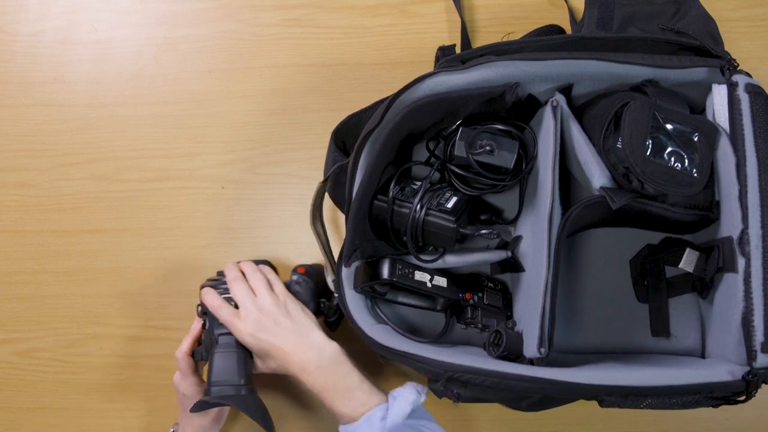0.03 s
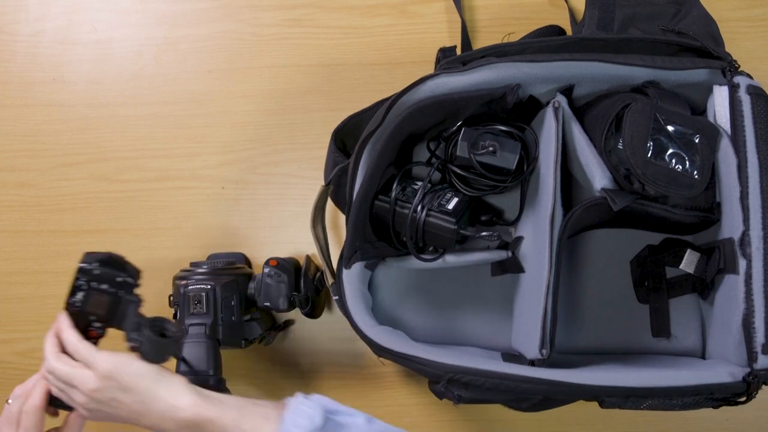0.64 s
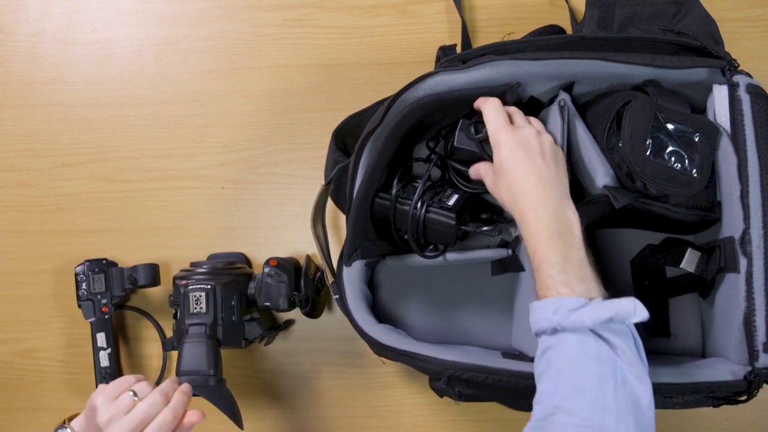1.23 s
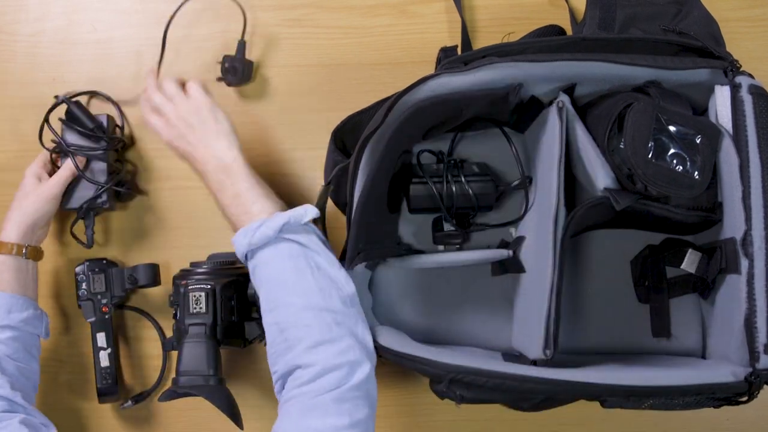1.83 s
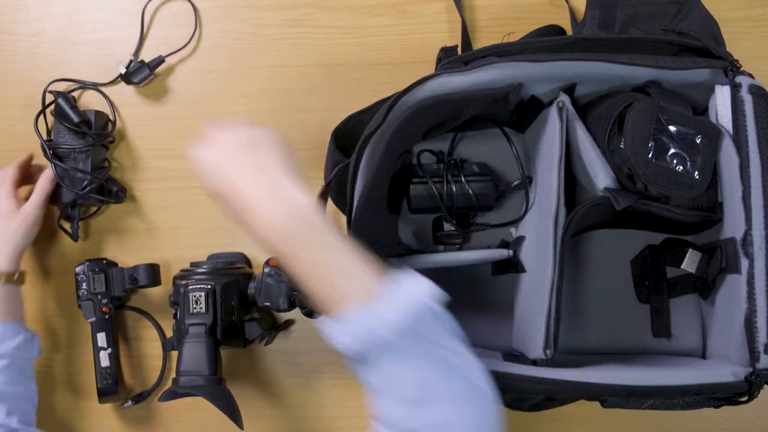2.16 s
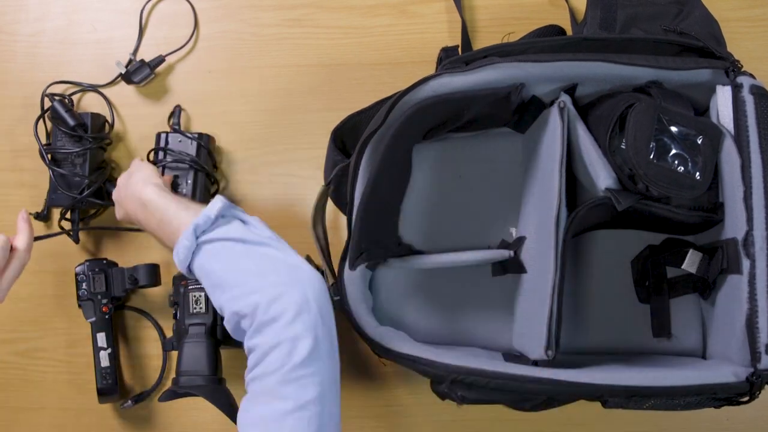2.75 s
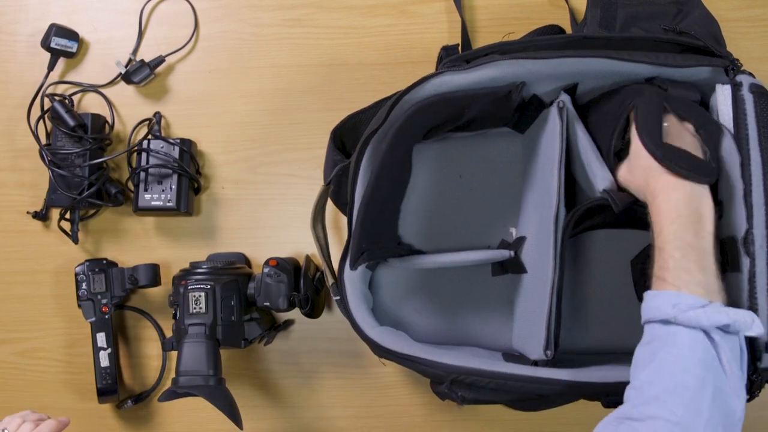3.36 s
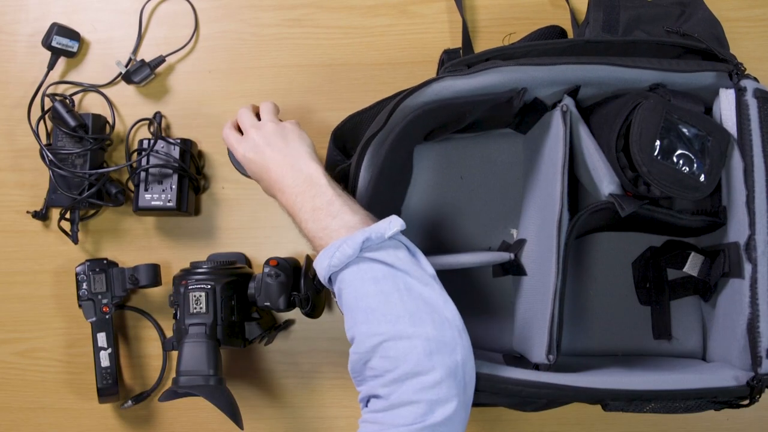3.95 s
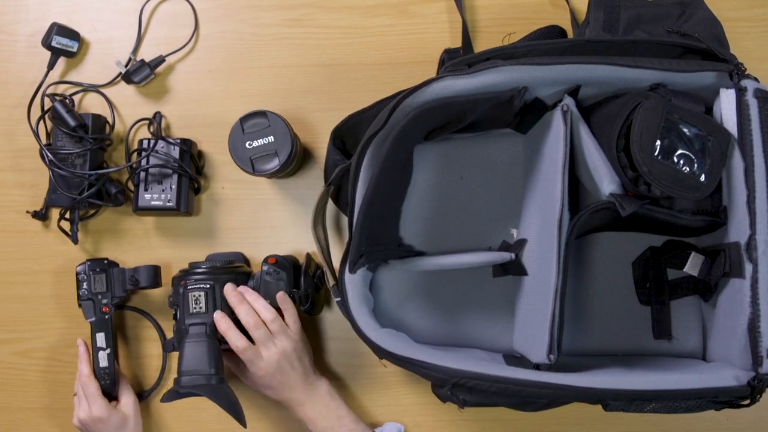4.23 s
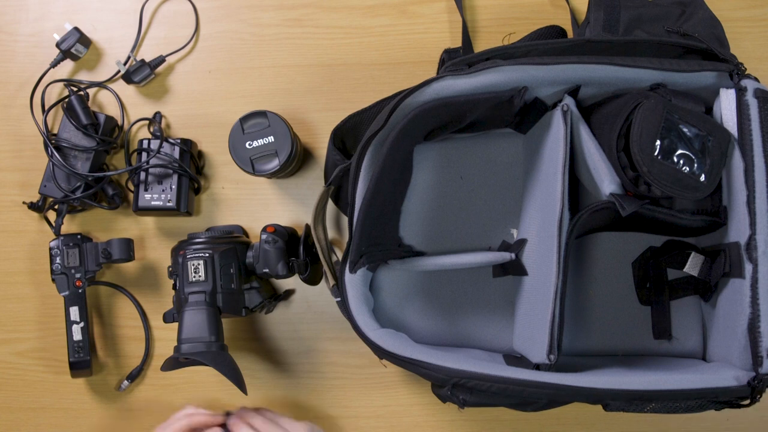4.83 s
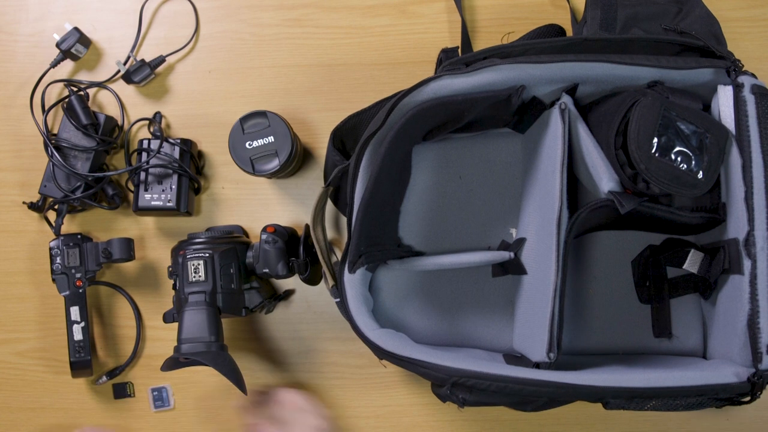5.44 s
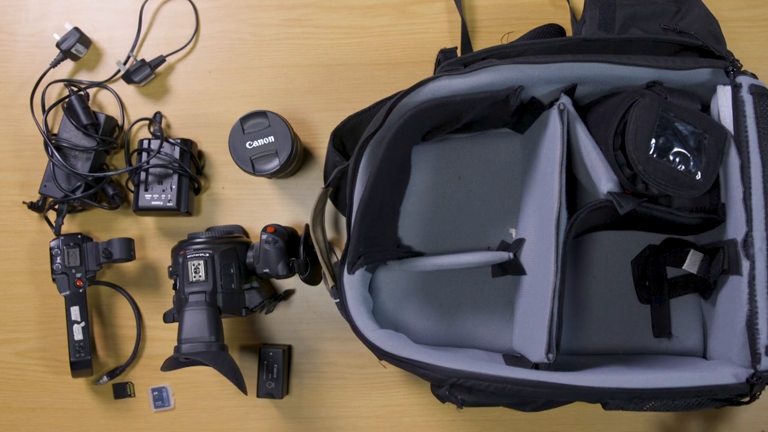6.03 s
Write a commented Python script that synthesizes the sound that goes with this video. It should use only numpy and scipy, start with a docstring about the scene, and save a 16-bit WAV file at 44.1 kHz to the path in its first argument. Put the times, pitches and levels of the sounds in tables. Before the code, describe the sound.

Camera equipment is unpacked onto a wooden desk, close to one microphone in a quiet, dry room. A soft nudge comes first, then a handle knocks down and slides, a power supply clatters, a charger lands hardest, and a lens gives a firm knock. Small plastic ticks follow, and a battery clacks down last. Between landings, sleeves brush a padded bag and cables creak faintly over low ventilation.

```python
"""Camera gear knocks down on a wooden desk, close to one microphone in a quiet, dry room.
A camera is nudged; a handle, a power supply, a charger, a lens, memory cards and a battery land edge by
edge, ring briefly under the hand and stick and slip into place. Leads creak and a plug clinks. Between
landings, sleeves brush a padded bag and handled gear bumps dully. Faint ventilation lies behind it all."""
import sys
import numpy as np
from scipy import signal
from scipy.fft import rfft, irfft, next_fast_len
from scipy.io import wavfile
from scipy.ndimage import uniform_filter1d, minimum_filter1d

SR = 44100
rng = np.random.default_rng(int(sys.argv[2]) if len(sys.argv) > 2 else 0)


def pcm_store(signal):
    """Save signal as 16-bit PCM."""
    levels = np.round(np.clip(np.atleast_2d(signal), -1, 1) * 32767)
    wavfile.write(sys.argv[1], SR, levels.astype(np.int16).T)


N = 272877
TIME = np.arange(N) / SR
BLOW_SPAN_S, TOP_HZ = .01, 16100


# Gear landing close to the microphone. In all knocks and strokes, level is that of 700-3500 Hz;
# body (below) and click or hiss (above) are relative to it.
# Blows (time [s], level [dB], body [dB], click [dB]); modes on the desk (pitch [Hz], level [dB], t60 [s])
CHARGER_KNOCKS = [(2.8037, -37, 5, -8.5), (2.8195, -34, -2.5, -12), (2.8539, -53, 0.5, -3.5),
                  (3.0935, -40, -8, 3), (3.1359, -18, -17.5, -10.5), (3.1645, -24.5, -13, -12),
                  (3.1844, -35, -23, -17)]
CHARGER_MODES = [(740, -4, 0.12), (994, -2, 0.11), (1130, -2.5, 0.079), (1293, 12.5, 0.025),
                 (2044, 2, 0.031), (2396, 5.5, 0.024), (2700, -4.5, 0.03), (3190, -1, 0.015),
                 (3960, -16.5, 0.031), (6100, -22, 0.023)]
# Colour of the dense, quickly damped modes (frequency [Hz], gain [dB])
CHARGER_COLOUR = [(88, -46), (150, -23), (226, -27), (383, -14.5), (578, -10.5), (730, -7), (888, -4),
                  (1100, 1.5), (1290, -9.5), (1390, 0.5), (3350, -10.5), (4410, -28.5), (5150, -23),
                  (10800, -36.5), (16000, -45)]
def charger():
    """The charger touches down, then lands with the hardest knock of all."""
    return knocks(CHARGER_KNOCKS, CHARGER_MODES, CHARGER_COLOUR, mode_db=-2.5, contact_db=-2.5,
                  ring_t60=0.043, grip_t60=0.26, treble_life=0.69, thump_db=-13.5)


# The handle on the desk; columns as for the charger
HANDLE_KNOCKS = [(0.8312, -34.5, -18.5, 3.5), (0.9078, -27.5, -7, -13), (0.913, -25, -3.5, -8),
                 (0.9166, -29.5, 3, -18), (0.933, -32, -0.5, -11), (1.0041, -48.5, -27, -14),
                 (1.0711, -49.5, 0, -19.5)]
HANDLE_MODES = [(422, 0, 0.06), (464, -8.5, .11), (491, -1, .09), (723, -1, 0.088), (736, 0, 0.068),
                (824, -12, 0.072), (1140, -5.5, 0.058), (1310, -14.5, 0.05), (1740, -6, 0.066),
                (2660, -10, 0.027), (8200, -11.5, 0.024)]
HANDLE_COLOUR = [(120, -23.5), (250, -22), (370, -19.5), (460, -0.5), (600, -6), (760, 1), (1000, -5.5),
                 (1500, -11.5), (2400, -13), (3600, -22.5), (6500, -21), (9000, -22.5), (16000, -35)]
def handle():
    """The handle's edges strike the wood in a quick cluster."""
    return knocks(HANDLE_KNOCKS, HANDLE_MODES, HANDLE_COLOUR, mode_db=-4, contact_db=-4,
                  ring_t60=0.036, grip_t60=0.12, treble_life=0.67, thump_db=-18)


# Strokes on the wood (peak [s], rise [s], fall [s], level [dB], body [dB], hiss [dB])
HANDLE_SLIDES = [(0.952, 0.016, 0.033, -38.5, -8.5, -6), (0.99, 0.03, 0.049, -41.5, -13, -18.5)]
def handle_slide():
    """The handle judders into place; friction rings its modes."""
    return rubbing(HANDLE_SLIDES, HANDLE_MODES, HANDLE_COLOUR, mode_db=4,
                   slips_per_s=2400, spread_db=4, edge_db=-13.5, judder_db=5.5)


# The power supply on the desk; columns as for the charger
SUPPLY_KNOCKS = [(1.7894, -26.5, -8, -14), (1.806, -25.5, -10.5, -10), (1.8521, -51.5, 4, -3),
                 (1.8745, -45.5, -15, -15), (1.898, -45.5, -18, -3.5), (1.9136, -40.5, -9, -9),
                 (1.9293, -33.5, -13, -15), (1.9358, -45, -17, 6.5), (1.9425, -28, -19, -10),
                 (1.9575, -32.5, -14, -13.5), (1.9782, -37.5, -6.5, -17), (1.9987, -46, -15, -18),
                 (2.0603, -52.5, -2, -5), (2.0821, -44.5, -22, -1), (2.2314, -43.5, -5, -2)]
SUPPLY_MODES = [(401, -3.5, 0.066), (685, -6.5, 0.094), (804, -14, 0.11), (1048, -6, 0.27),
                (1283, -3.5, 0.048), (1480, -6, 0.017), (1710, -0.5, 0.045), (2520, -6, 0.024),
                (3330, -19, 0.051), (4323, -23, 0.011)]
SUPPLY_COLOUR = [(88, -59), (150, -16.5), (270, -25), (398, -6.5), (578, -3), (662, 4), (821, -9),
                 (1190, -2), (1360, -11.5), (1600, 1.5), (2180, -11.5), (2500, -4), (4670, -27),
                 (5570, -28.5), (16000, -47)]
def power_supply():
    """The power supply lands on two edges and clatters as it settles."""
    return knocks(SUPPLY_KNOCKS, SUPPLY_MODES, SUPPLY_COLOUR, mode_db=-6.5, contact_db=-8,
                  ring_t60=0.032, grip_t60=0.18, treble_life=0.68, thump_db=-15)


# The lens on the desk; columns as for the charger
LENS_KNOCKS = [(3.8339, -25, -6, -14.5), (3.8785, -39.5, -1.5, -10)]
LENS_MODES = [(386, -12, 0.1), (440, -28, 0.015), (622, -11, .06), (797, -11, 0.063), (1060, -4, 0.12),
              (1120, 2, 0.03), (1315, -13, 0.017), (1770, 4, 0.01), (2470, -17, 0.0355), (5030, -19, 0.035)]
LENS_COLOUR = [(150, -13), (280, -9), (376, 4.5), (550, -2), (850, 2), (1100, 1.5), (1400, 1), (1750, -2),
               (2400, -9), (3200, -9), (4200, -26), (5000, -23), (7000, -23.5), (16000, -61)]
def lens():
    """The lens meets the wood with one firm knock and a lighter one."""
    return knocks(LENS_KNOCKS, LENS_MODES, LENS_COLOUR, mode_db=-3.5, contact_db=-6,
                  ring_t60=0.036, grip_t60=0.33, treble_life=0.8, thump_db=-6)


# The battery on the desk; columns as for the charger
BATTERY_KNOCKS = [(5.7772, -29, -6.5, -16), (5.7832, -39.5, -6, -5.5), (5.8009, -25, -11, -10),
                  (5.8779, -49, -22, -14), (5.9302, -65.5, -11, 6)]
BATTERY_MODES = [(460, -6, 0.16), (625, -8, 0.27), (1051, 0.5, 0.14), (1704, -5.5, 0.049),
                 (2130, -12.5, 0.033), (2260, 1, 0.062), (3240, -10, 0.04), (3160, -16, 0.031),
                 (4670, 0, 0.026), (5420, -11, 0.041)]
BATTERY_COLOUR = [(88, -45), (150, -13), (291, -15), (484, 2), (601, -6.5), (805, 1.5), (905, -8),
                  (1170, -5), (1360, -4), (1870, -2.5), (2100, -12), (2360, -5), (3420, -16.5),
                  (6640, -15.5), (16000, -36)]
def battery():
    """The battery clacks down edge by edge."""
    return knocks(BATTERY_KNOCKS, BATTERY_MODES, BATTERY_COLOUR, mode_db=-9.5, contact_db=2,
                  ring_t60=0.036, grip_t60=0.27, treble_life=0.84, thump_db=-12)


# The camera on the desk; columns as for the charger
CAMERA_KNOCKS = [(0.0009, -42.5, -7.5, -26), (0.1291, -38.5, -10.5, -11), (0.1459, -54, 9.5, -11),
                 (0.1994, -58.5, 3.5, -25)]
CAMERA_MODES = [(291, -22, .09), (510, -5, 0.029), (690, 0.5, 0.043), (1062, -1.5, 0.15), (1530, -9, 0.041)]
CAMERA_COLOUR = [(88, -33), (150, -11), (391, 6), (566, -2.5), (905, -9), (1190, -19), (1290, -13),
                 (1420, -18.5), (7770, -26), (16000, -51)]
def camera():
    """Nudged, the camera knocks softly on the wood."""
    return knocks(CAMERA_KNOCKS, CAMERA_MODES, CAMERA_COLOUR, mode_db=-8.5, contact_db=4.5,
                  ring_t60=0.039, grip_t60=0.18, treble_life=0.62, thump_db=-14)


# Handling strokes (peak [s], rise [s], fall [s], level [dB], body [dB], hiss [dB])
HANDLING_RUBS = [(0.045, 0.027, 0.069, -53.5, -34, -3.5), (0.165, 0.041, 0.085, -67, 8.5, 0),
                 (0.855, 0.016, 0.02, -51, -34, 14), (0.88, 0.037, 0.047, -51.5, -28, 0),
                 (1.357, 0.027, 0.0088, -58.5, -20, -2), (1.885, 0.023, 0.074, -51, 0.5, -11.5),
                 (1.95, 0.016, 0.026, -34.5, -8.5, -18), (2.0, 0.028, 0.24, -56.5, 3.5, -33),
                 (2.13, 0.049, 0.082, -43.5, -12.5, -11.5), (2.95, 0.051, 0.065, -55.5, -6.5, -34),
                 (3.187, 0.017, 0.025, -41, -13, -27), (3.44, 0.18, 0.25, -67, -17, -4.5),
                 (3.945, 0.024, 0.077, -57.5, -17, -11.5), (4.245, 0.03, 0.029, -78, 20, -22),
                 (4.4, 0.081, 0.087, -58, -5, -2.5), (4.44, 0.03, 0.032, -45.5, -1.5, -6),
                 (5.085, 0.055, 0.12, -58.5, -19, -2), (5.222, 0.022, 0.016, -50.5, -33.5, 3),
                 (5.89, 0.02, 0.13, -54.5, -15.5, -15)]
# Desk modes (pitch [Hz], level [dB], t60 [s]); friction colour (frequency [Hz], gain [dB])
DESK_MODES = [(480, -2.5, .06), (526, -6.5, .05), (784, -6, 0.096), (1105, -0.5, 0.04), (1309, 1, 0.028),
              (1650, 0, 0.043), (1820, -3.5, 0.038), (2360, -5, 0.011)]
RUB_COLOUR = [(88, -44), (150, -14.5), (566, 6.5), (888, -3), (1190, -3), (1760, -9), (4240, -6.5),
              (5150, -6.5), (6510, -6.5), (8900, -5.5), (10000, -15), (14500, -18.5), (16000, -21)]
def handling_rubs():
    """Short rubs, scuffs and soft swells of handled gear."""
    return rubbing(HANDLING_RUBS, DESK_MODES, RUB_COLOUR, mode_db=-9,
                   slips_per_s=3500, spread_db=2.5, edge_db=-14, judder_db=3.5)


# Light touches, heard close (time [s], level [dB], click [dB]); modes and colour as for the charger
PLASTIC_TICKS = [(0.057, -60.5, 7), (0.2143, -69.5, 12.5), (0.7127, -70, 12.5), (1.0914, -64, 4.5),
                 (1.1497, -62.5, 3.5), (1.1573, -52, 2.5), (1.3949, -56, 4), (1.4813, -67.5, 10),
                 (2.4288, -70, 10), (2.7051, -73, 16), (2.9492, -67.5, 9.5), (3.0858, -58.5, 4.5),
                 (3.1274, -60, 6.5), (4.8288, -64.5, -5), (4.8803, -72.5, 14), (5.036, -48.5, -2.5),
                 (5.0446, -54, -9), (5.0728, -43.5, -0.5), (5.1074, -54, 6.5), (5.1232, -56, 2.5),
                 (5.143, -47.5, -7), (5.2535, -61.5, -4.5), (5.9535, -64, 3.5), (6.0691, -66.5, -6)]
PLASTIC_MODES = [(1520, -6, 0.036), (2210, 19, 0.042), (3020, -3, 0.055), (4370, -21, 0.0078),
                 (8570, -7, 0.032)]
PLASTIC_COLOUR = [(88, -38), (150, 1), (406, -7.5), (745, 5.5), (2920, 4.5), (3490, -1), (4580, -15.5),
                  (5050, -18.5), (7040, -17), (16000, -19.5)]
def plastic_ticks(body_db):
    """Plastic touches plastic, every tick equally thin."""
    ticks = [(s, db, body_db, click_db) for s, db, click_db in PLASTIC_TICKS]
    return knocks(ticks, PLASTIC_MODES, PLASTIC_COLOUR, mode_db=-18.5, contact_db=-0.5,
                  ring_t60=0.055, grip_t60=0.15, treble_life=0.25, thump_db=-8.5)


# The plug's pins (pitch [Hz], level [dB], t60 [s])
PLUG_MODES = [(2400, -10.5, 0.045), (3200, -4, 0.018), (3570, 0, 0.018), (4370, -16, 0.047)]
def plug(at_s, db, contact_db, grip_t60):
    """A plug swings against the power supply: a sharp contact and the short ring of the pins."""
    track, t = np.zeros(N), TIME[:SR // 10]
    pins = unit(ring(PLUG_MODES, t) * fade(t, grip_t60))
    contact = amp(contact_db) * unit(band(1. * (t == 0), 2000, TOP_HZ))
    add(track, at_s, amp(db) * np.sqrt(BLOW_SPAN_S * SR) * unit(pins + contact))
    return track


# Soft bumps (time [s], level [dB], body [dB]); modes and colour as for the charger
SOFT_BUMPS = [(0.455, -75.5, 17.5), (0.6341, -76, 19.5), (0.7132, -66.5, 11.5), (1.1734, -71.5, 22),
              (1.4211, -47.5, 1.5), (1.5306, -61, 7), (2.3259, -58, 1), (2.4525, -57, 6.5),
              (2.4851, -61, 8.5), (2.5559, -60.5, 0), (3.3482, -60, -0.5), (3.5747, -57.5, -4.5),
              (4.2186, -65.5, 16), (4.24, -73, 20.5), (4.5276, -65, 0), (4.5724, -69.5, 10.5),
              (4.9558, -64.5, 0)]
BUMP_MODES = [(213, -3, 0.061), (287, -8.5, 0.069), (382, -2, 0.035), (403, -5, 0.13), (478, -1, 0.045),
              (980, 1, 0.016)]
BUMP_COLOUR = [(88, -44), (150, -8.5), (368, -0.5), (905, -6), (1760, -4.5), (2450, -15), (3420, -21),
               (4320, -61), (4760, -40), (16000, -52)]
def soft_bumps(click_db):
    """Dull bumps and knocks of gear being handled."""
    bumps = [(s, db, body_db, click_db) for s, db, body_db in SOFT_BUMPS]
    return knocks(bumps, BUMP_MODES, BUMP_COLOUR, mode_db=-4.5, contact_db=-7.5,
                  ring_t60=0.014, grip_t60=0.18, treble_life=1, thump_db=-8)


# Leads gathered, lifted and let go at the desk (start [s], end [s], level [dB])
CABLE_MOVES = [(1.239, 1.449, -67.5), (1.465, 1.62, -68.5), (1.624, 1.724, -77), (1.857, 2.053, -68.5),
               (2.281, 2.621, -71.5), (2.75, 2.816, -73), (2.884, 3.084, -69)]
# Their plastic sheath (frequency [Hz], gain [dB])
SHEATH_COLOUR = [(200, -19.5), (900, -8), (2200, -2), (3400, -2), (4800, -12), (7000, -14), (16000, -15)]
def cables(taps_per_s, spread_db, tap_t60, flex_db):
    """Coiled leads creak and tap against each other; every tap is its own short burst."""
    track, t = np.zeros(N), TIME[:SR // 30]
    for start, end, db in CABLE_MOVES:
        taps = grains(int((end - start) * SR), taps_per_s, spread_db)
        envelope = signal.fftconvolve(np.abs(taps), fade(t, tap_t60))
        bursts = envelope * rng.standard_normal(len(envelope))
        add(track, start, level(colour(bursts, SHEATH_COLOUR), db))
        add(track, start, level(band(taps, 76, 150), db + flex_db))  # faint bass under each tap
    return track


# A sleeve sweeping past the bag or desk, before the band gains
# (fastest at [s], speeding up [s], slowing down [s], level [dB], body re level [dB])
ARM_REACHES = [(0.1, .2, 0.19, -61.5, -5), (0.58, 0.25, 0.27, -69, 1.5), (1.25, 0.22, 0.38, -68.5, -0.5),
               (1.56, 0.17, 0.23, -69.5, 2.5), (2.26, 0.47, .16, -65, -2.5), (2.54, 0.21, 0.15, -72, 6.5),
               (2.94, 0.43, 0.72, -70, 0), (3.3, .16, 0.21, -70, -3), (3.599, 0.2, .26, -70, 0.5),
               (3.941, 0.27, .18, -70.5, -2.5), (4.28, 0.27, 0.2, -70, 4), (4.549, 0.068, 0.15, -71.5, 5),
               (4.98, .22, .16, -70.5, 6.5), (5.22, 0.17, 0.25, -67, -12), (5.55, 0.095, 0.22, -75.5, 10),
               (5.9, 0.27, 0.2, -65, -6)]
# The fibres (frequency [Hz], gain [dB])
CLOTH_COLOUR = [(100, -21), (200, -2.5), (300, 5.5), (500, -0.5), (900, -3.5), (1600, -9), (3300, -12.5),
                (6000, -15), (9000, -20), (16000, -20.5)]
def cloth(body_gain_db, rustle_gain_db, hiss_gain_db, flutter_db, speed_power):
    """Fibres catch and let go as a sleeve brushes the padding, louder the faster the arm moves."""
    friction, weight = np.zeros(N), np.zeros(N)
    for fastest, rise, fall, db, body_db in ARM_REACHES:
        speed = np.sin(np.pi / 2 * np.interp(TIME, [fastest - rise, fastest, fastest + fall], [0, 1, 0]))
        stroke = amp(db) * speed ** speed_power
        friction = np.hypot(friction, stroke)
        weight = np.hypot(weight, amp(body_db) * stroke)
    fibres = colour(grains(N, 1200, 5.2) + amp(-1.5) * rng.standard_normal(N), CLOTH_COLOUR)
    body = level(band(fibres, 200, 500), body_gain_db) * weight
    rustle = level(band(fibres, 640, 3100), rustle_gain_db) * friction
    hiss = level(band(fibres, 5000, 28000), hiss_gain_db) * friction
    return (body - rustle + hiss) * amp(flutter_db * walk(55))  # the sign keeps the crossovers in phase


def walls(x, wet_db, t60):
    """This close, the walls add only a faint, dull tail to the direct sound."""
    t = TIME[:SR // 2]
    tail = band(rng.standard_normal(len(t)), 180, 4500) * fade(t, t60) * (1 - fade(t, 0.038))
    return x + amp(wet_db) * signal.fftconvolve(x, unit(tail))[:N]


# The quiet room at the microphone (frequency [Hz], gain [dB])
ROOM_COLOUR = [(25, -34.5), (50, -30), (80, -18.5), (120, -6.5), (190, -2), (250, -4), (320, -4),
               (510, -0.5), (800, -10), (1300, -13), (2000, -17.5), (4000, -23.5), (13000, -23.5),
               (16000, -29)]
def room_tone(air_db, duct_db):
    """Steady ventilation with a faint duct resonance, and microphone hiss."""
    air = level(colour(rng.standard_normal(N), ROOM_COLOUR), air_db)
    return air + level(band(rng.standard_normal(N), 188, 206), duct_db)


def knocks(blows, modes, dense_colour, mode_db, contact_db, ring_t60, grip_t60, treble_life, thump_db):
    """Each blow: a contact click, dense case and desk modes, and clear modes damped by the hand."""
    track, t = np.zeros(N), TIME[:SR // 6]
    impulse = 1. * (t == 0)
    thump = unit(band(impulse, 66, 150)) * np.sqrt(BLOW_SPAN_S * SR)
    for s, db, body_db, click_db in blows:
        t60 = ring_t60 * amp(-.22 * click_db)  # bright, glancing contacts ring shorter
        low, high = rng.standard_normal((2, len(t)))
        dense = band(low, 130, 1900) * fade(t, t60)
        dense += band(high, 1800, 18000) * fade(t, t60 * treble_life)
        case = unit(colour(unit(dense) + amp(contact_db) * impulse, dense_colour))
        clear = unit(ring(modes, t) * fade(t, grip_t60))
        blow = balance(band(case + amp(mode_db) * clear, 190, 20000), db, body_db, click_db, BLOW_SPAN_S)
        # a faint low thump follows each click, louder with sharper clicks
        add(track, s, blow + amp(db + click_db + thump_db) * thump)
    return track


def rubbing(strokes, modes, rub_colour, mode_db, slips_per_s, spread_db, edge_db, judder_db):
    """Strokes of stick and slip that swell and ebb, ringing the given modes."""
    track, judder = np.zeros(N), walk(160)
    for peak, rise, fall, db, body_db, hiss_db in strokes:
        rise, fall = np.maximum([rise, fall], BLOW_SPAN_S)
        t = TIME[:int((rise + fall) * SR)]
        slips = grains(len(t), slips_per_s, spread_db) + amp(-8) * rng.standard_normal(len(t))
        slips *= amp(judder_db * np.interp(peak + t, TIME, judder))  # the grip catches and lets go
        rung = signal.fftconvolve(slips, ring(modes, TIME[:SR // 10]))[:len(t)]
        rub = unit(colour(slips, rub_colour)) + amp(mode_db) * unit(rung)
        pressure = amp(np.interp(t, [0, rise, rise + fall], [edge_db, 0, edge_db]))
        pressure *= signal.windows.tukey(len(t), .15)
        add(track, peak - rise, pressure * balance(rub, db, body_db, hiss_db, len(t) / SR))
    return track


def ring(modes, t, scatter_db=0.5, detune=.004):
    """Decaying modes; each contact excites them in other shares. Small things radiate no bass."""
    hz, db, t60 = np.transpose(modes)[:, :, None]
    share, shift, side = rng.standard_normal((len(modes), 3)).T[:, :, None]
    strength = np.sign(side) * amp(db + scatter_db * share)
    swing = np.cos(2 * np.pi * hz * (1 + detune * shift) * t)
    return band(np.sum(strength * fade(t, t60) * swing, axis=0), 240, TOP_HZ)


def grains(count, per_s, spread_db):
    """Tiny slips at random moments, a few much larger than the rest."""
    happens = rng.random(count) < per_s / SR
    sizes = amp(spread_db * np.minimum(rng.exponential(size=count), 3))
    return level(happens * sizes * rng.choice([-1, 1], count) + 1e-9, 0)


def walk(per_s):
    """Smooth random wander with a spread near one."""
    hold = int(SR / per_s)
    steps = np.repeat(rng.standard_normal(N // hold + 1), hold)[:N]
    return level(uniform_filter1d(steps, hold), 0)


def balance(x, db, body_db, treble_db, span_s):
    """Set body, middle and treble to their levels, as rms over span_s."""
    power = 2 * np.abs(rfft(x)) ** 2 / len(x) / (span_s * SR)
    hz = np.arange(len(power)) * SR / len(x)
    present_db = 10 * np.log10(np.histogram(hz, (200, 700, 3500, 16000), weights=power)[0])
    body, middle, treble = db + np.array([body_db, 0, treble_db]) - present_db
    return colour(x, [(550, body), (850, middle), (3000, middle), (4200, treble)])


def colour(x, points, size=4096):
    """Causal filter through (Hz, dB) points, built from the cepstrum of the gain."""
    n = 2 * next_fast_len((len(x) + size) // 2)
    hz, db = np.transpose(points)
    grid = np.maximum(np.arange(n // 2 + 1) * SR / n, 1)
    cepstrum = irfft(np.log(amp(np.interp(np.log(grid), np.log(hz), db))), n)
    cepstrum[1:n // 2] *= 2
    cepstrum[n // 2 + 1:] = 0
    return irfft(rfft(x, n) * np.exp(rfft(cepstrum)), n)[:len(x)]


def band(x, low_hz, high_hz):
    """Butterworth band-pass."""
    edges = [low_hz, min(high_hz, SR / 2 - 1)]
    return signal.sosfilt(signal.butter(2, edges, "band", fs=SR, output="sos"), x)


def amp(db):
    """Decibels to gain."""
    return 10 ** (np.asarray(db) / 20)


def unit(x):
    """Scale to an energy of one."""
    return x / np.sqrt(np.sum(x ** 2))


def level(x, db):
    """Scale to an rms level."""
    return unit(x) * np.sqrt(len(x)) * amp(db)


def fade(t, t60):
    """Decay by 60 dB in t60 seconds."""
    return np.exp(-np.log(1000) * t / t60)


def add(track, s, sound):
    """Mix a sound into the track at a time."""
    start = max(int(s * SR), 0)
    track[start:start + len(sound)] += sound[:N - start]


def scene():
    """Gear, cloth and room at one microphone close to the desk."""
    gear = camera() + handle() + power_supply() + charger() + lens() + battery()
    gear += plastic_ticks(body_db=-7.5) + soft_bumps(click_db=-14.5)
    gear += handle_slide() + handling_rubs()
    gear += plug(at_s=1.5843, db=-45, contact_db=-16, grip_t60=0.051)
    gear += cables(taps_per_s=240, spread_db=5.5, tap_t60=0.0066, flex_db=-16)
    sleeves = cloth(body_gain_db=-4.5, rustle_gain_db=-2.5, hiss_gain_db=-6,
                    flutter_db=4.5, speed_power=1.23)
    return (walls(gear + sleeves, wet_db=-34.5, t60=0.12) + room_tone(air_db=-72.5, duct_db=-77.5))[None]


def record(dry):
    """A fast limiter holds the hardest knocks at its ceiling; the recorder cuts the top."""
    ceiling, window = amp(-12), 45  # window in samples, about 1 ms
    needed = ceiling / np.maximum(np.abs(dry), ceiling)
    gain = uniform_filter1d(minimum_filter1d(needed, window), window)
    return signal.sosfilt(signal.ellip(10, .2, 70, TOP_HZ, fs=SR, output="sos"), dry * gain)


dry = scene()
out = record(dry)
pcm_store(out)
```